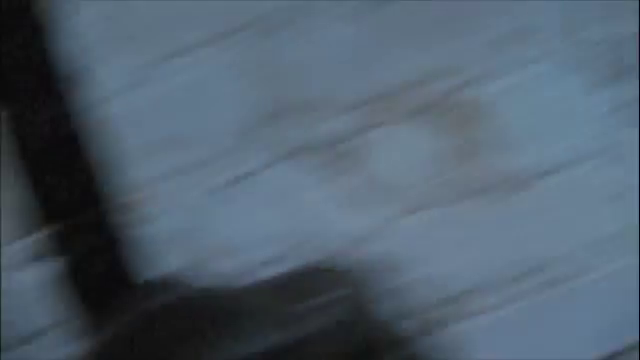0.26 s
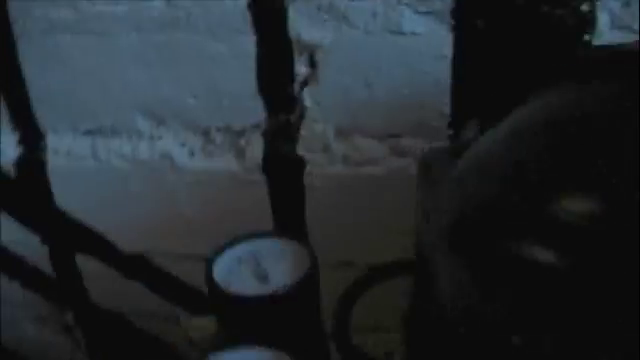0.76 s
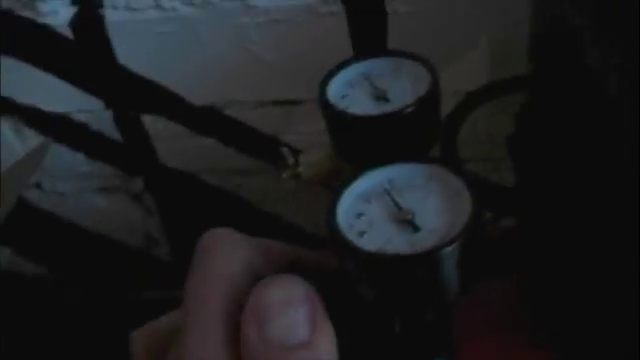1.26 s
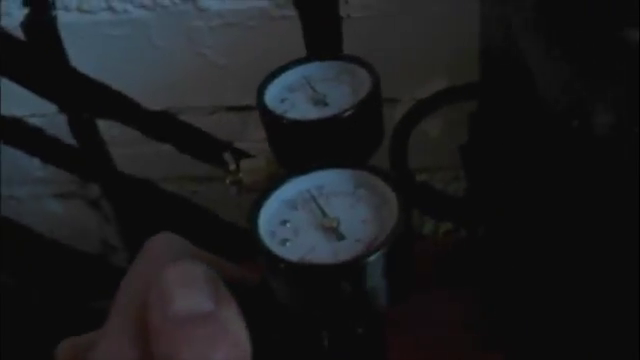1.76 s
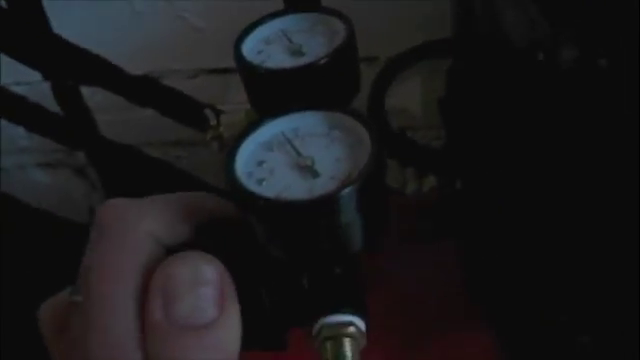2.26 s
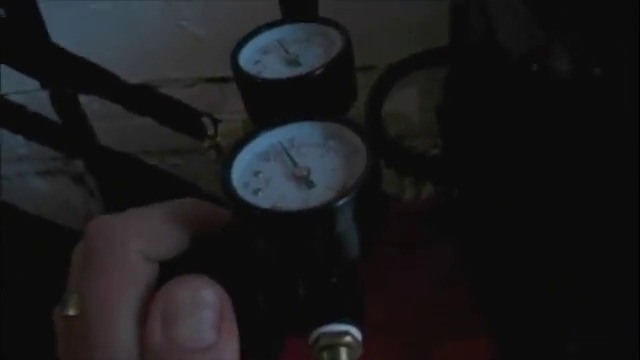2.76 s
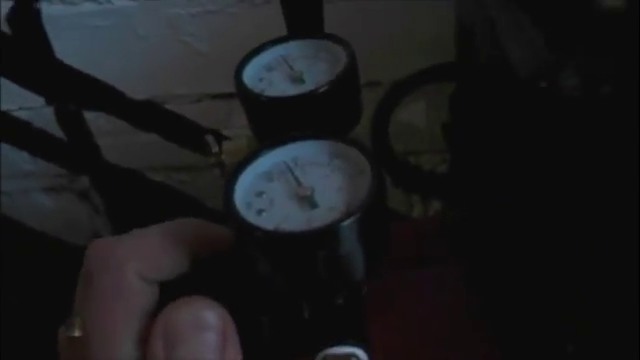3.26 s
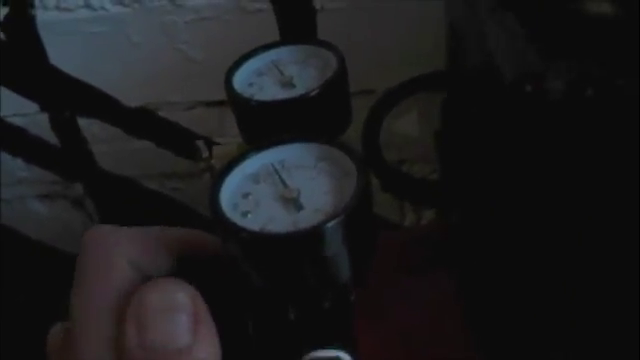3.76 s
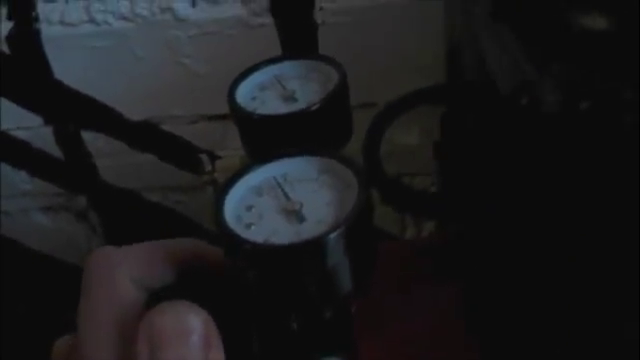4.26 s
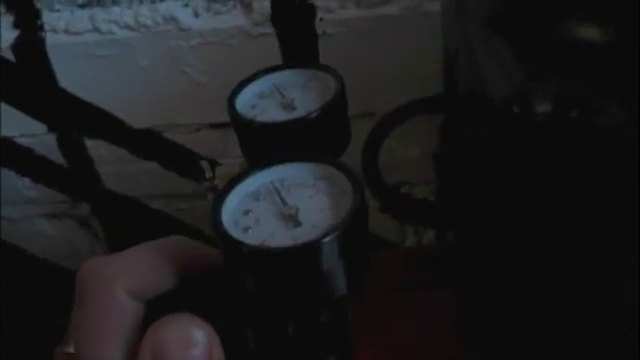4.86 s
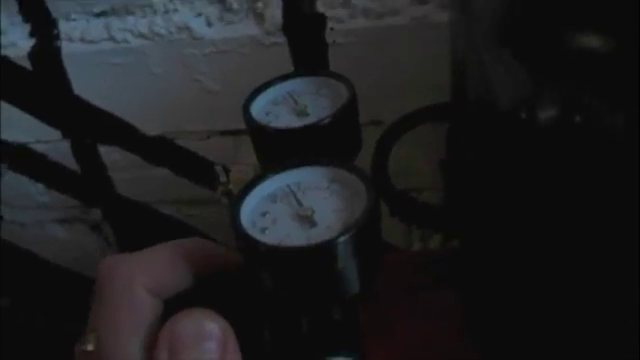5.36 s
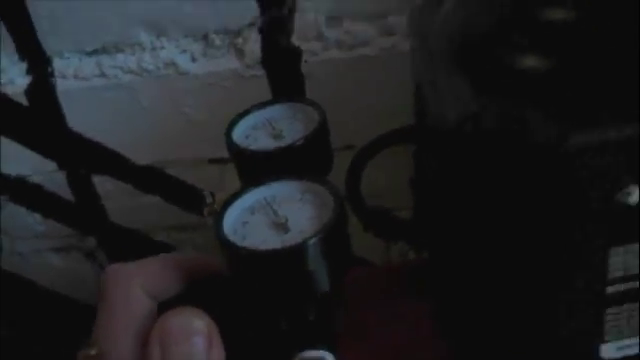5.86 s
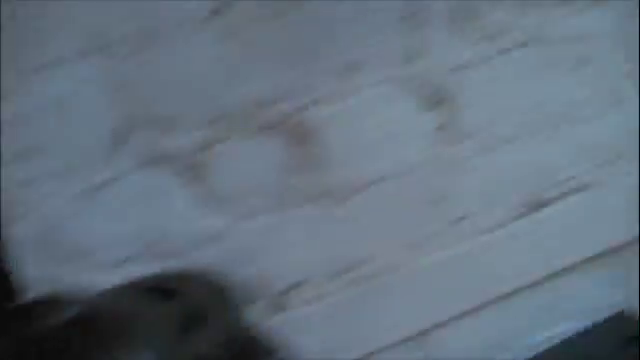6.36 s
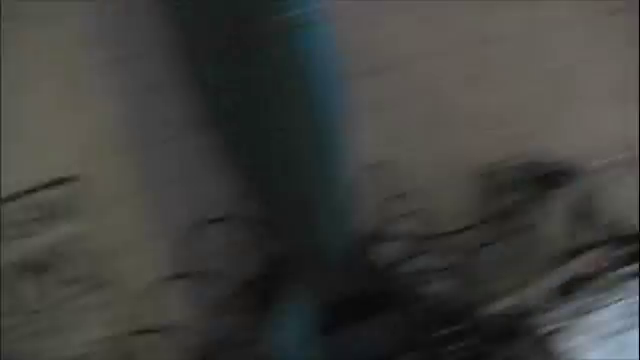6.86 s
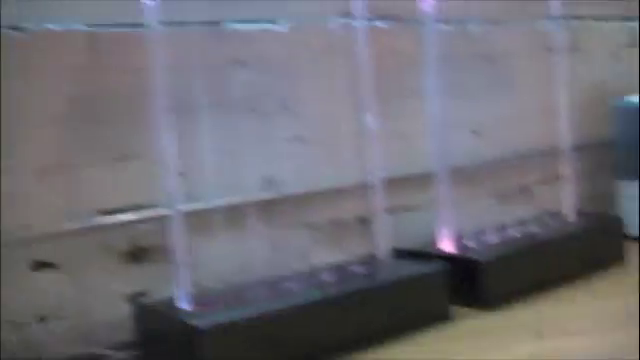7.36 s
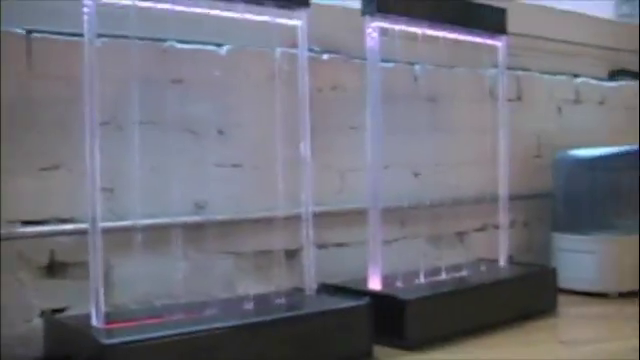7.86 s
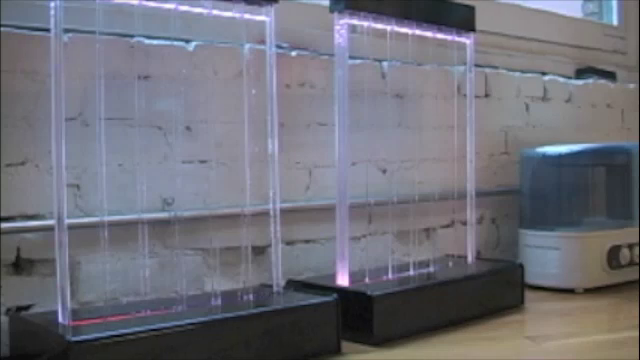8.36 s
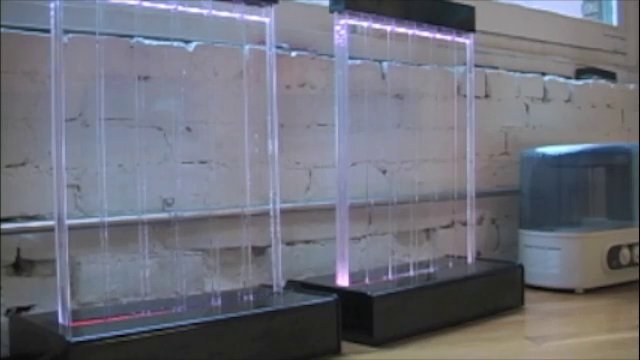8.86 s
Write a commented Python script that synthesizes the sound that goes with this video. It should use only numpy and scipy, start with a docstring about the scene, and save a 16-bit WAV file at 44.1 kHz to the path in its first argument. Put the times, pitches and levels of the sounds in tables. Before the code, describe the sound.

A close stereo pickup in a brick workshop, with steady low rumble, faint hiss and barely audible high machinery whines throughout. At 0 s a loose brass fitting clinks brightly and echoes. Dull bumps and dry skin scuffs run from 0.2 to 0.7 s, with tiny clinks from 0.8 s. At 1.0 s a regulator knob snaps, by far the loudest sound, crisp with a short housing ring. A soft tap lands at 1.4 s. Thin, high air leaks from about 1.6 s, stronger after 1.7 s, swelling until it stops abruptly near 2.1 s; a second, slightly fuller snap cuts in at 1.8 s. Quiet hollow thumb taps follow at 2.1, 2.5, 2.7, 3.8, 4.5 and 5.6 s. The hiss opens somewhat after 6 s, with faint clinks at 6.4 and 6.9 s and scuffs around 7.5 s. Firm knocks cluster at 8.1-8.6 s with brass clinks, a rough scuff and one low footfall, then room tone.

```python
"""A hand works the locking knob of a pressure regulator in a brick workshop, heard by two close microphones.
A brass clink (a chattering pulse with ringing modes) opens over low rumble, faint hiss and whines (shaped noise).
Dull bumps and dry scuffs follow, then a sharp snap, a thumb tap, a short air leak (noise through resonances)
with a second snap inside it, and more soft taps (dying sines). Late on come further clinks and scuffs, knocks
as things are set down, and one low footfall. Dense, dying noise echoes give the sound of the room."""
import sys
import numpy as np
from scipy import signal
from scipy.io import wavfile
from scipy.ndimage import uniform_filter1d

SR = 44100
rng = np.random.default_rng(int(sys.argv[2]) if len(sys.argv) > 2 else 0)


def volts(x):
    """Linear amplitude factor 10**(x/20) for a level x in dB, scalar or array-like."""
    e = np.asarray(x, float) / 20
    return 10 ** e


def dump(signal):
    """Clip the signal to [-1, 1] and save it as 16-bit WAV at the path in sys.argv[1]."""
    limited = np.clip(np.atleast_2d(signal).T, -1, 1)
    pcm = np.round(limited * 32767).astype(np.int16)
    wavfile.write(sys.argv[1], SR, pcm)


N = 402191  # length in samples


def evened(x):
    """Scales a sound to an rms level of 1."""
    return x / np.sqrt(np.mean(x ** 2) + 1e-20)


def read(points, hz):
    """Reads a curve of (Hz, value) points along a log frequency axis."""
    f, value = np.transpose(points)
    return np.interp(np.log(hz + 1), np.log(f + 1), value)


def add(mix, s, sound, pan_db, wet_db):
    """Places a sound (one row, or left, right and room) left, right and on the send to the room."""
    part = mix[:, round(s * SR):][:, :sound.shape[-1]]
    gains = volts(np.array([[pan_db / 2], [-pan_db / 2], [wet_db]]))  # a positive pan leans left
    part += gains * sound[..., :part.shape[1]]


def ring(modes, rise):
    """Sums dying sines (Hz, dB, seconds to fall 60 dB) with a soft start (seconds), peak 1."""
    t = np.arange(SR // 4) / SR
    x = sum(volts(db - 60 * t / t60) * np.sin(2 * np.pi * hz * t) for hz, db, t60 in modes)
    x = x * (1 - np.exp(-t / rise))
    return x / abs(x).max()


def band(x, hz, width):
    """Passes a sound through one resonance whose gain is 1 at its centre."""
    centre = min(hz, .4 * SR)
    sharpness = hz / min(width, .3 * SR)
    b, a = signal.iirpeak(centre, sharpness, SR)
    return signal.lfilter(b, a, x)


def crack(t60, late_db=-14):
    """A burst of dying noise with a weaker after-rattle that lasts three times longer."""
    t = np.arange(SR // 20) / SR
    fade = volts(-60 * t / t60) + volts(late_db - 20 * t / t60)
    return rng.standard_normal(len(t)) * fade


def click(spectrum):
    """The pulse with this spectrum that starts as promptly as it can (minimum phase), peak 1."""
    hz = abs(np.fft.fftfreq(4096, 1 / SR))
    log_gain = np.log(volts(read(spectrum, hz)) + 1e-5)
    phase = -signal.hilbert(log_gain).imag
    pulse = np.fft.ifft(np.exp(log_gain + 1j * phase)).real[:2048]
    return pulse / abs(pulse).max()


def rattle(pulse, t60, same, split_hz=2200):
    """A pulse struck by a short chatter, whose treble dies sooner and differs more left and right."""
    first, other = crack(t60), crack(t60)
    even = np.zeros(len(first))  # the room hears the plain pulse, as strong as the chatter
    even[0] = np.linalg.norm(first)
    same = np.clip(same, 0, 1)
    low = signal.butter(2, split_hz, fs=SR, output="sos")
    treble = np.array([first, same * first + np.sqrt(1 - same ** 2) * other])
    treble = treble - signal.sosfilt(low, treble)
    treble = treble * volts(7 - 55 * np.arange(len(first)) / SR / t60)
    left_right = signal.sosfilt(low, first) + treble
    sound = signal.fftconvolve(pulse[None], [*left_right, even], axes=1)
    return sound / abs(sound[:2]).max()


# Likeness of left and right in the steady noise.
# Each row: frequency in Hz, likeness from 0 (unrelated) to 1 (identical).
LIKENESS = [(60, 0.99), (180, 0.99), (550, 0.77), (1650, 0.59), (4970, 0.051), (15000, 0.05)]


def steady(spectrum, patchy_db, tilt_db=0):
    """Noise from random short-time spectra with drifting patches, partly alike in both microphones."""
    frames, hz = N // 512 + 5, np.fft.rfftfreq(2048, 1 / SR)
    a, b, c, d, patches = rng.standard_normal((frames, 1025, 5)).T
    patches = evened(uniform_filter1d(uniform_filter1d(patches, 20, 0), 8, 1))
    same = np.clip(read(LIKENESS, hz), -1, 1)[:, None]
    left = a + 1j * b
    right = same * left + np.sqrt(1 - same ** 2) * (c + 1j * d)
    tilt = np.log2(hz / 2000 + .1)[:, None] * tilt_db
    z = np.array([left, right]) * volts(read(spectrum, hz)[:, None] + patchy_db * patches + tilt)
    return evened(signal.istft(z, nperseg=2048, noverlap=1536)[1][:, :N])


# Colour of the low rumble. Each row: frequency in Hz, relative level in dB.
RUMBLE_COLOUR = [(12, -52), (20, -19.5), (75, -3), (128, -3), (170, -6.5), (207, -12.5), (353, -21),
                 (380, -24), (428, -25), (700, -25), (910, -61.5), (1540, -120)]
# Colour of the hiss before its tilt. Each row: frequency in Hz, relative level in dB.
HISS_COLOUR = [(180, -35.5), (300, -10), (574, -13), (689, -18), (801, -13), (930, -15.5), (1750, -19),
               (1970, -20.5), (3240, -23), (7950, -28), (16000, -30.5)]
# Faint whines of distant machinery.
# Each row: pitch in Hz, width of each of two filters in Hz, level in dB, start in seconds, end in seconds.
MACHINE_WHINES = [(4470, 60, -91, 0, 6.45), (4772, 45, -87, 0, 7.1), (5160, 45, -89, 1.5, 5.1),
                  (1710, 40, -85, 0, 5.3), (1170, 30, -85, 6.2, 8.1)]
# How far the microphones face away from the sheltered corner into the open room.
# Each row: time in seconds, share from 0 (corner) to 1 (open room).
FACING_OPEN = [(0, .75), (.5, 0.6), (1.0, .9), (2, .1), (3, 0), (6.1, 0.05), (6.6, 0.5), (7.3, 0.3),
               (7.7, 0.5), (8.1, .5), (8.7, 0.5), (8.9, 0.8), (9.12, 0.85)]
# The rumble dips while the microphones swing. Each row: start in seconds, end in seconds, change in dB.
RUMBLE_DIPS = [(6.351, 7.498, -3), (8.851, 9.308, -3)]
RUMBLE_DB, DIP_EDGE_S = -56, 0.13
CORNER_HISS_DB, OPEN_HISS_DB = -66.5, -56
HISS_TILT_DB = -0.71  # per octave, about 2 kHz


def room_tone():
    """Rumble and whines of distant machinery, made of filtered noise, and the hiss of room and microphones."""
    t = np.arange(N) / SR
    facing = np.interp(t, *np.transpose(FACING_OPEN))
    dip_db = 0
    for start, end, db in RUMBLE_DIPS:
        dip_db = dip_db + db * np.clip(np.minimum(t - start, end - t) / DIP_EDGE_S + .5, 0, 1)
    rumble = volts(RUMBLE_DB + dip_db) * steady(RUMBLE_COLOUR, patchy_db=1.1)
    hiss_db = CORNER_HISS_DB + (OPEN_HISS_DB - CORNER_HISS_DB) * facing
    hiss = volts(hiss_db) * steady(HISS_COLOUR, .3, HISS_TILT_DB)
    noise = rng.standard_normal(N)
    whines = 0
    for hz, width, db, start, end in MACHINE_WHINES:
        heard = np.clip(np.minimum(t - start, end - t) / 0.067, 0, 1)
        whines = whines + volts(db) * heard * evened(band(band(noise, hz, width), hz, width))
    return volts([[-.3], [.3]]) * (rumble + hiss + whines)  # slightly stronger on the right


# Clinks of the brass fitting. Each row: start in seconds, blow level in dB, ring in dB against the blow,
# send to the room in dB, pitch factor of the part struck.
BRASS_CLINKS = [(0.0, -22.5, -12.5, 4, 1.02), (0.791, -38, -21, -17.5, 1.12),
                (0.812, -39.5, -14, -14, 1.18), (0.892, -52.5, 4.5, -6, 1.1), (0.929, -43, -2.5, -19, 1.06),
                (0.957, -51, -4, -14, 1.12), (6.418, -35, -3.5, -4.5, 1.02), (6.857, -45, -5, -9.5, 0.98),
                (8.38, -29, -6, 2, .98), (8.473, -40, -5, -4, 1.26)]
# The broad clatter of the fitting. Each row: frequency in Hz, relative level in dB.
BRASS_CLATTER = [(900, -38.5), (1500, -23.5), (2200, -17), (2600, -2), (3300, -3), (4600, -9.5),
                 (5400, -0.5), (6600, -6), (8000, -8), (10000, -9), (12700, -11.5), (14500, -18.5),
                 (16000, -45.5)]
# Ringing modes of the brass at pitch factor 1.
# Each row: pitch in Hz, relative level in dB, seconds to fall 60 dB.
BRASS_RINGING = [(2560, -0.5, .08), (2670, -1.5, .06), (2820, -4, 0.051), (3020, 0, 0.039), (3241, -5, .02),
                 (3430, -6.5, 0.021), (5400, -6, 0.056), (5800, -8.5, 0.044), (6500, -12.5, .03),
                 (7900, -13, 0.045), (8200, -13, .04)]
CLINK_PAN_DB = -2


def clinks():
    """Loose brass clatters broadly while a few high modes ring through it."""
    mix = np.zeros((3, N))
    for s, db, ring_db, wet_db, factor in BRASS_CLINKS:
        clatter = rattle(click(BRASS_CLATTER), t60=0.055, same=.8)
        add(mix, s, volts(db) * clatter, CLINK_PAN_DB, wet_db)
        modes = [(factor * hz, level_db, t60) for hz, level_db, t60 in BRASS_RINGING]
        ringing = rattle(ring(modes, rise=0.00033), t60=0.038, same=0.99)
        add(mix, s, volts(db + ring_db) * ringing, CLINK_PAN_DB, wet_db)
    return mix


# Strength of the echoes the walls give back. Each row: frequency in Hz, relative level in dB.
WALL_COLOUR = [(200, 1.5), (500, -8.5), (1500, -0.5), (4000, 0), (8000, -1), (15000, 0)]
# How long the echoes last. Each row: frequency in Hz, seconds to fall 60 dB.
ECHO_TIMES = [(200, 0.96), (500, 0.86), (1500, 0.84), (4000, 0.62), (8000, 0.67), (14000, .28)]


def workshop(send, same=0.56):
    """Dense echoes that build up over some milliseconds, each band dying at its own speed."""
    echoes = rng.standard_normal((2, SR))
    echoes[1] = same * echoes[0] + np.sqrt(1 - np.clip(same, 0, 1) ** 2) * echoes[1]
    echoes *= np.clip((np.arange(SR) / SR - .003) / 0.0049, 0, 1)
    hz, t, z = signal.stft(echoes, SR, nperseg=256)
    fade_db = read(WALL_COLOUR, hz)[:, None] - 60 * t / read(ECHO_TIMES, hz)[:, None]
    tail = signal.istft(z * volts(fade_db), SR, nperseg=256)[1]
    return signal.fftconvolve(send[None], tail / np.linalg.norm(tail[0]), axes=1)[:, :N]


# Dull bumps and knocks. Each row: start in seconds, blow level in dB, body pitch in Hz,
# crack in dB against the blow, pan in dB (left over right).
BUMPS_AND_KNOCKS = [(0.177, -51, 465, -10, 17), (0.269, -44, 380, -24, 7.5),
                    (0.303, -39.5, 320, -29.5, 10.5), (0.331, -38, 320, -17, 1),
                    (0.343, -35, 318, -27.5, 3), (0.55, -43, 318, -18.5, 14), (0.643, -43, 367, -20, -8),
                    (0.715, -35.5, 325, -22.5, 2), (7.04, -44.5, 328, -4, 5), (8.099, -38.5, 363, -13, 2),
                    (8.135, -36.5, 395, -4.5, 1.5), (8.1763, -20, 762, -1, 2), (8.2262, -21, 694, -2, 2),
                    (8.378, -26, 753, -11, 2.5), (8.391, -31, 730, -14, 3), (8.437, -31.5, 746, -5, 2),
                    (8.461, -32.5, 670, -8, 4), (8.474, -33.5, 712, -9.5, 5), (8.572, -36, 793, 7.5, 13.5),
                    (8.61, -40, 507, 1, 1)]
# Modes of the hollow body. Each row: factor on the body pitch, relative level in dB, seconds to fall 60 dB.
BODY_MODES = [(.55, -2.5, 0.024), (1, 1.5, 0.018), (1.399, -5, 0.016), (1.902, -4.5, .018), (2.6, -8, 0.01)]
SOFT_CRACK_HZ, FIRM_BLOW_DB, DB_PER_OCTAVE = 1400, -34, 7.5  # blows above the firm level crack brighter


def knocks():
    """A rough blow shakes a hollow body, with a noisy crack at the contact."""
    mix = np.zeros((3, N))
    for s, db, pitch_hz, crack_db, pan_db in BUMPS_AND_KNOCKS:
        body = ring([(pitch_hz * k, level_db, t60) for k, level_db, t60 in BODY_MODES], rise=0.0024)
        add(mix, s, volts(db) * rattle(body, t60=0.038, same=0.61), pan_db, wet_db=-8.5)
        hz = SOFT_CRACK_HZ * 2 ** (max(db - FIRM_BLOW_DB, 0) / DB_PER_OCTAVE)
        contact = band(band(signal.unit_impulse(512), hz, 1.8 * hz), hz, 1.8 * hz)
        add(mix, s, volts(db + crack_db) * rattle(contact, t60=0.039, same=0.23), pan_db, wet_db=1.5)
    return mix


# Scuffs of skin and cloth. Each row: start in seconds, level in dB, length in seconds, centre in Hz.
SKIN_AND_CLOTH = [(0.328, -62, .004, 2500), (0.388, -59.5, 0.007, 9000), (0.44, -61, 0.0053, 9000),
                  (0.683, -63.5, .005, 9000), (0.465, -62, .02, 3916), (0.542, -60.5, 0.023, 7110),
                  (0.624, -60.5, 0.028, 6707), (0.803, -57.5, 0.018, 9000), (0.92, -61, 0.015, 9000),
                  (0.952, -59, 0.011, 9000), (1.3, -58, 0.044, 5000), (1.64, -70, 0.004, 7980),
                  (2.179, -66, 0.015, 8900), (3.195, -70, .04, 7970), (4.353, -67.5, 0.008, 9060),
                  (4.458, -69.5, 0.041, 9000), (5.99, -65.5, 0.0114, 6140), (6.654, -66, .015, 6000),
                  (6.69, -67, 0.013, 6000), (6.76, -63, 0.012, 7900), (6.834, -64.5, 0.036, 7000),
                  (6.898, -66.5, 0.0048, 9000), (7.02, -65.5, 0.029, 6000), (7.495, -60, 0.076, 6500),
                  (7.5, -59, 0.09, 1600), (7.544, -48, 0.0033, 6000), (7.547, -59.5, 0.037, 5000),
                  (7.6, -67, 0.082, 8000), (7.706, -64.5, 0.034, 8985), (8.57, -42, 0.0217, 1750),
                  (8.6, -52, 0.058, 1760), (9.041, -59.5, 0.061, 3400)]
# The grip also shifts faintly at random times: level, length and centre each lie between two bounds.
SHIFT_COUNT, SHIFT_DB, SHIFT_S, SHIFT_HZ = 16, (-74.5, -68), (.005, 0.024), (3500, 9000)


def scuffs():
    """Grainy friction noise swells and fades under a short stroke."""
    mix = np.zeros((3, N))
    low, high = np.transpose([(0, N / SR), SHIFT_DB, SHIFT_S, SHIFT_HZ])
    shifts = low + (high - low) * rng.random((SHIFT_COUNT, 4))
    for s, db, length, hz in [*SKIN_AND_CLOTH, *shifts]:
        noise, grain = rng.standard_normal((2, 4000))[:, :round(length * SR)]
        grain = volts(1.3 * evened(uniform_filter1d(grain, size=40)))
        stroke = signal.windows.tukey(len(noise), .6)
        rub = band(band(noise * grain, hz, 1.2 * hz), hz, 1.2 * hz)
        add(mix, s, volts(db) * evened(rub) * stroke, pan_db=-3.7, wet_db=-5)
    return mix


# Knob snaps. Each row: start in seconds, blow level in dB, pan in dB (left over right).
KNOB_SNAPS = [(0.9914, -.5, -2), (1.7877, -2.5, -3.5)]
# Colour of each snap, unlocking then locking. Each row: frequency in Hz, relative level in dB.
LATCH_COLOURS = [
    [(120, -44), (200, -15.5), (491, 1.5), (806, -5.5), (1450, -3.5), (1900, -11.5), (2380, -11),
     (4520, -12.5), (4860, -15.5), (5520, -4.5), (6640, -18.5), (7410, -8), (9230, -15), (10100, -10),
     (14300, -25.5), (16000, -31.5)],
    [(120, -46.5), (200, -6.5), (400, 3.5), (683, 3.5), (1060, -2.5), (1710, -14.5), (2420, -6.5),
     (2860, 0), (3190, -12.5), (3760, -1), (4950, -11), (5420, -8), (8740, -15.5), (12600, -18.5),
     (15100, -25.5), (16000, -38.5)],
]
# What the walls hear of each snap. Each row: frequency in Hz, relative level in dB.
WALL_SNAP_COLOURS = [
    [(120, -53), (200, -24.5), (373, -17.5), (416, -6), (749, -19.5), (1710, -19), (7400, -27), (8050, -21),
     (8700, -28), (14100, -33.5), (16000, -89.5)],
    [(120, -47), (200, -16.5), (284, -5), (366, -9), (423, -5), (528, -9), (968, -7.5), (1270, -19.5),
     (2150, -16.5), (2550, -8.5), (3000, -18.5), (3500, -17), (4060, -9), (4470, -18.5), (5000, -18),
     (5450, -7.5), (5950, -18.5), (9000, -24.5), (11700, -54.5), (19800, -120)],
]
# Modes of the housing, ringing on after a snap.
# Each row: pitch in Hz, relative level in dB, seconds to fall 60 dB.
HOUSING_MODES = [(325, -9, 0.055), (417, -5.5, 0.4), (512.4, -7, .1), (585, -7, 0.37), (985, -6, 0.14),
                 (1160, -5, .12), (1496, -9, .1), (1740, -8.5, 0.066)]
SNAP_ROOM_DB, SNAP_RING_DB = (-9, -16), (-18.5, -25)  # against the blow, one for each snap


def snaps():
    """The latch chatters briefly and the housing rings on."""
    mix = np.zeros((3, N))
    settings = zip(KNOB_SNAPS, SNAP_ROOM_DB, SNAP_RING_DB, LATCH_COLOURS, WALL_SNAP_COLOURS)
    for (s, db, pan_db), wet_db, ring_db, colour, wall_colour in settings:
        sound = rattle(click(colour), t60=0.076, same=1.0, split_hz=2000)
        towards_walls = click(wall_colour)
        match = np.linalg.norm(sound[0]) / np.linalg.norm(towards_walls)  # same energy as the left
        sound[2] = 0
        sound[2, :len(towards_walls)] = towards_walls * match
        add(mix, s, volts(db) * sound, pan_db, wet_db)
        add(mix, s, volts(db + ring_db) * ring(HOUSING_MODES, rise=.002), pan_db=-1.0, wet_db=-14)
    return mix


# Thumb taps on the hollow knob. Each row: start in seconds, blow level in dB before the share of each touch,
# boost of the modes above 800 Hz in dB.
THUMB_TAPS = [(1.361, -34, -5.5), (2.065, -44, 2.5), (2.469, -43.5, -3), (2.709, -45.5, -3),
              (3.76, -33, -2), (4.41, -44.5, -5), (4.553, -46, -2.5), (5.578, -34.5, -1.5)]
# Modes of the knob before that boost.
# Each row: pitch in Hz, relative level in dB, seconds to fall 60 dB.
KNOB_MODES = [(542.6, -7.5, 0.049), (615, -9.5, .12), (611.6, -2.5, 0.029), (940, -2, 0.056),
              (955, -6, 0.07), (1150, -9, .03), (1540, -11, 0.031), (1840, -12.5, 0.03), (3520, -6.5, 0.01)]


def taps():
    """A thumb pad rings a few low knob modes, with a second touch just after and a loose rebound later."""
    mix = np.zeros((3, N))
    for s, db, upper_db in THUMB_TAPS:
        modes = [(hz, level_db + upper_db * (hz > 800), t60) for hz, level_db, t60 in KNOB_MODES]
        sound = volts(db) * ring(modes, rise=.0015)
        for delay, touch_db in [(0, 0.5), (.011, -4.5), (.085, -15.5)]:
            add(mix, s + delay, volts(touch_db) * sound, pan_db=-1.2, wet_db=-17)
        nail = band(signal.unit_impulse(512), 2800, 4000)  # the nail's edge
        add(mix, s, volts(db - 8.5) * rattle(nail, t60=0.013, same=0.54), pan_db=3.0, wet_db=-9.0)
    return mix


# Resonances of the small cavities behind the valve seat.
# Each row: pitch in Hz, width of each of two filters in Hz, relative level in dB.
SEAT_CAVITIES = [(6000, 250, -16.5), (10020, 450, 0), (11375, 1300, -2), (13370, 500, -14.5),
                 (14260, 460, -14.5), (14880, 400, -15), (12000, 7200, -12.5)]
# Air passing the seat seeps, blows once the valve lifts, swells, and is cut off.
SEEP_S, LIFT_S, SHUT_S, LIFT_RISE_S = 1.56, 1.69, 2.065, .03
SEEP_DB, BLOW_DB, SWELL_DB_PER_S, CUT_DB_PER_S = -71.5, -57.5, 14, 602


def leak():
    """A thin jet of noise whistles in the small cavities behind the seat."""
    mix = np.zeros((3, N))
    t = SEEP_S + np.arange(3 * SR // 5) / SR
    lifted = np.clip((t - LIFT_S) / LIFT_RISE_S + .5, 0, 1)
    db = SEEP_DB + lifted * (BLOW_DB - SEEP_DB + SWELL_DB_PER_S * (t - LIFT_S))
    db = db - CUT_DB_PER_S * np.maximum(t - SHUT_S, 0)
    jet = rng.standard_normal(len(t))
    whistle = 0
    for hz, width, level_db in SEAT_CAVITIES:
        whistle = whistle + volts(level_db) * evened(band(band(jet, hz, width), hz, width))
    soft_ends = signal.windows.tukey(len(t), .1)
    add(mix, SEEP_S, volts(db) * evened(whistle) * soft_ends, pan_db=-2.8, wet_db=-12)
    return mix


# A footfall through the floor.
# Each row: start in seconds, level in dB, pitch in Hz, seconds to fall 60 dB.
FLOOR_THUDS = [(8.572, -41.5, 54.7, 0.28)]


def footfall():
    """A low dying sine with a weaker, shorter overtone comes through the floor."""
    mix = np.zeros((3, N))
    for s, db, hz, t60 in FLOOR_THUDS:
        thud = ring([(hz, 0, t60), (4.4 * hz, -6, 0.51 * t60)], rise=0.0099)
        add(mix, s, volts(db) * thud, pan_db=0, wet_db=0)
    return mix[:2]  # no echoes


def scene():
    """Adds all handling sounds, their echoes, the footfall and the room tone."""
    mix = clinks() + knocks() + scuffs() + snaps() + taps() + leak()
    small = signal.butter(4, 190, "high", fs=SR, output="sos")  # small things radiate no bass
    mix = signal.sosfilt(small, mix)
    return mix[:2] + workshop(mix[2]) + footfall() + room_tone()


def roll_off(x):
    """The treble ends steeply here."""
    return signal.sosfilt(signal.butter(12, 16570, fs=SR, output="sos"), x)


def record(dry):
    """Removes the highest treble with a steep low-pass filter and finishes the mix."""
    low_pass = signal.firwin(127, 16000, window=("kaiser", 7), fs=SR)  # edge in Hz
    limited = signal.oaconvolve(dry, low_pass[None], "same")
    return roll_off(limited)


dry = scene()
out = record(dry)
dump(out)
```